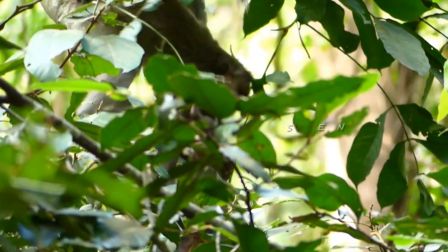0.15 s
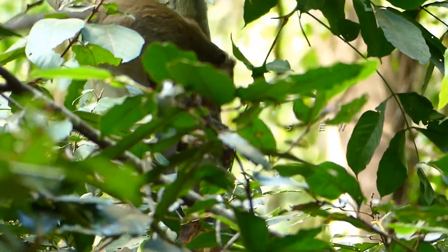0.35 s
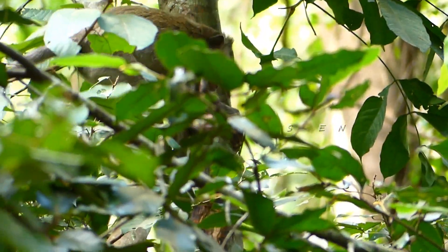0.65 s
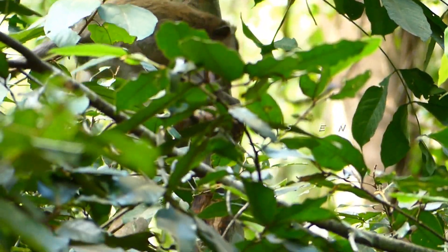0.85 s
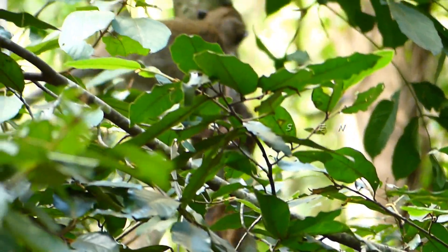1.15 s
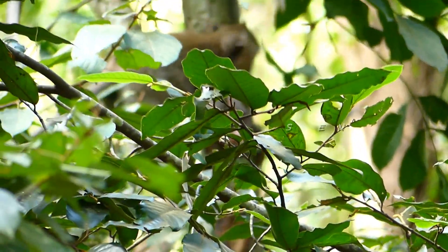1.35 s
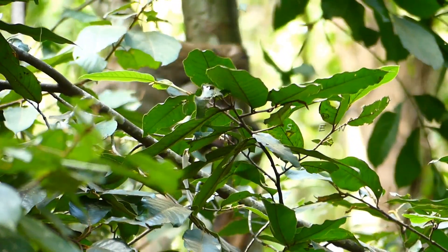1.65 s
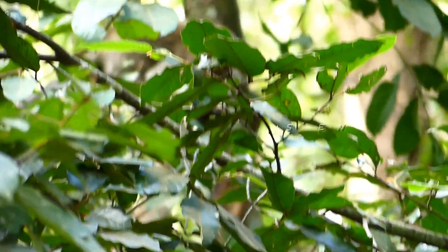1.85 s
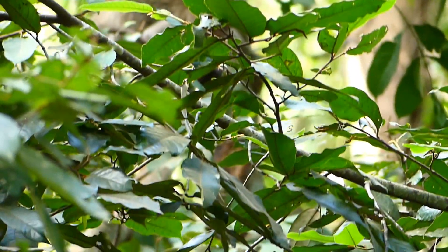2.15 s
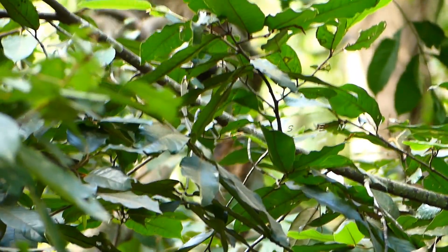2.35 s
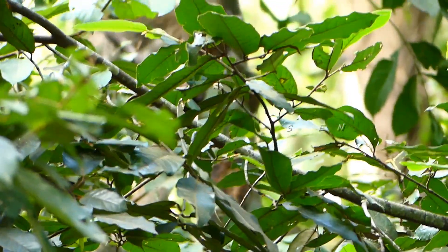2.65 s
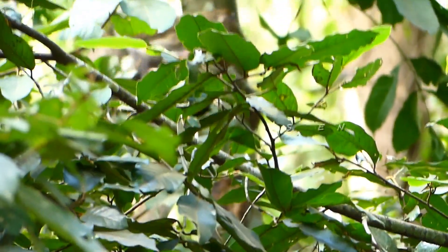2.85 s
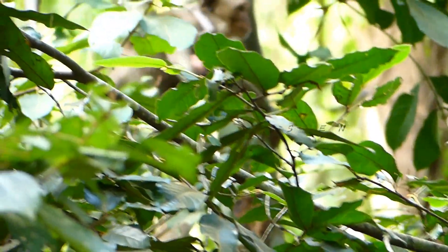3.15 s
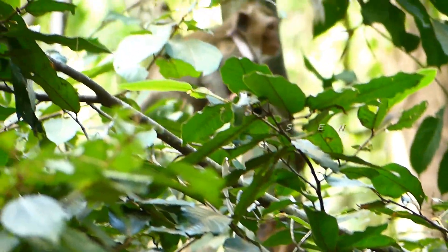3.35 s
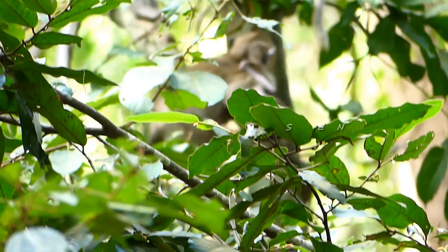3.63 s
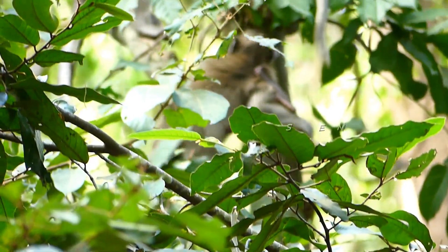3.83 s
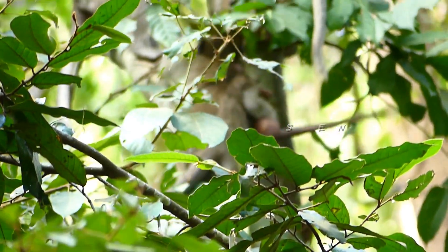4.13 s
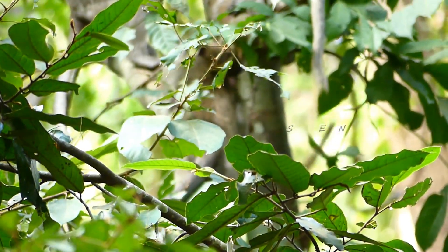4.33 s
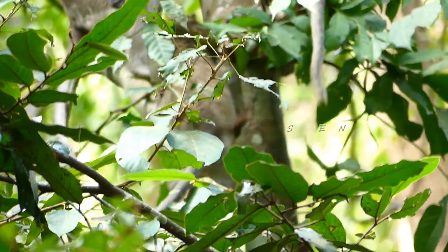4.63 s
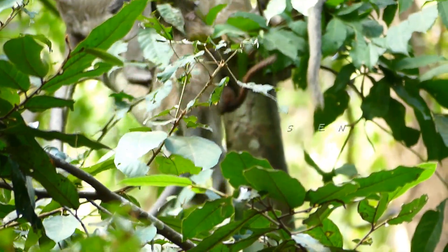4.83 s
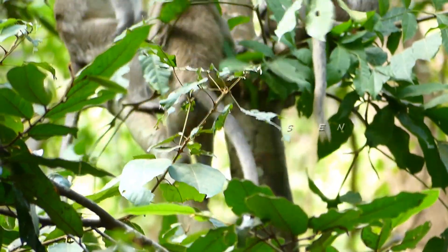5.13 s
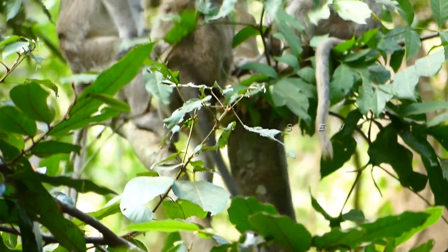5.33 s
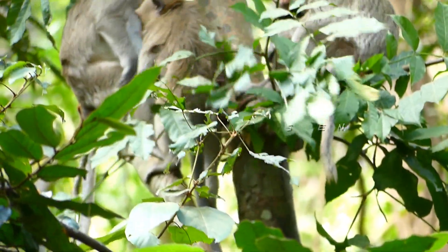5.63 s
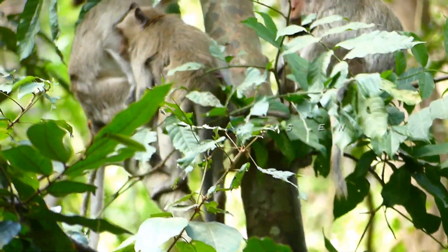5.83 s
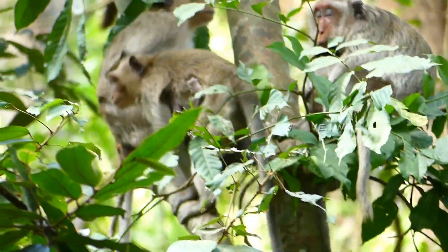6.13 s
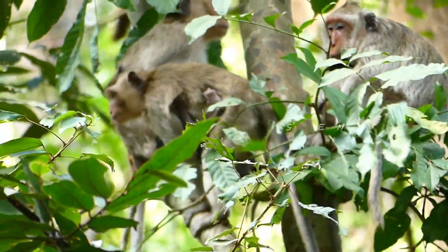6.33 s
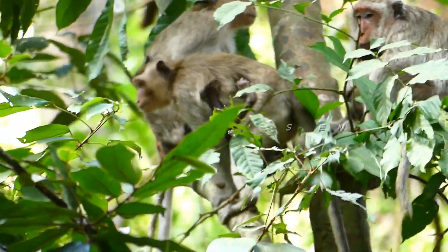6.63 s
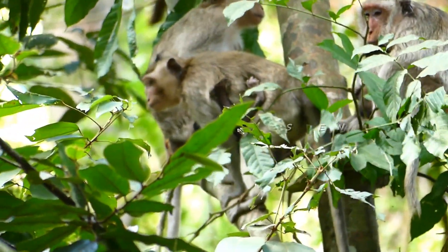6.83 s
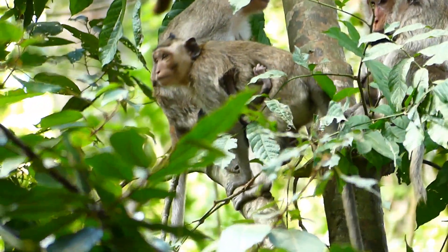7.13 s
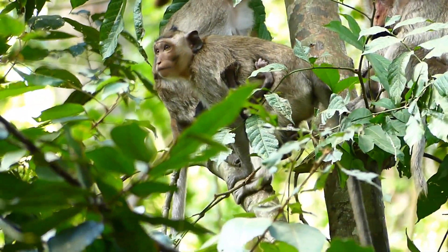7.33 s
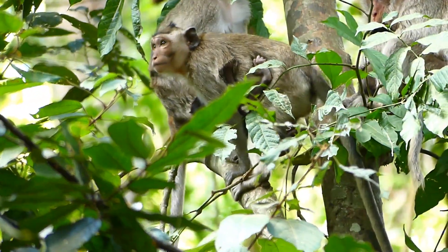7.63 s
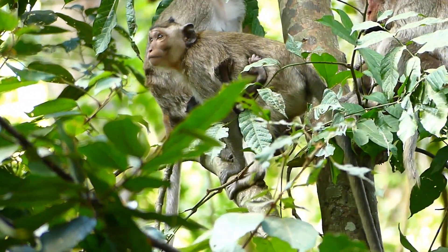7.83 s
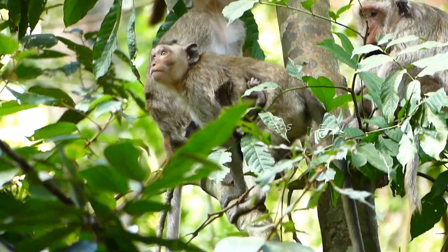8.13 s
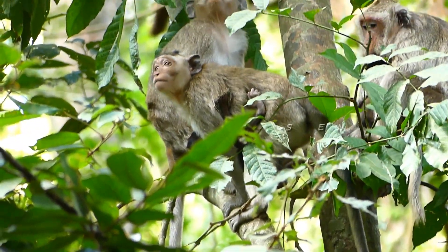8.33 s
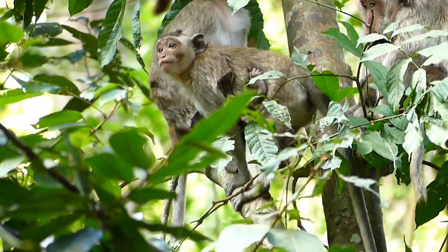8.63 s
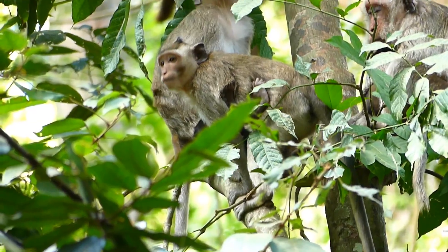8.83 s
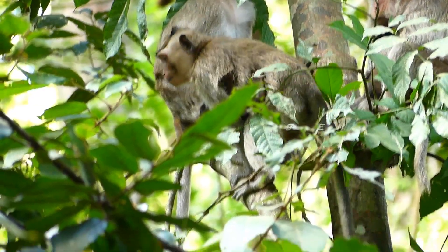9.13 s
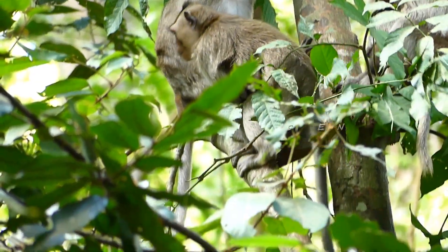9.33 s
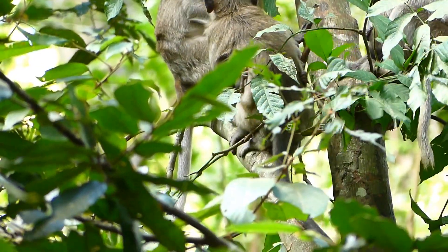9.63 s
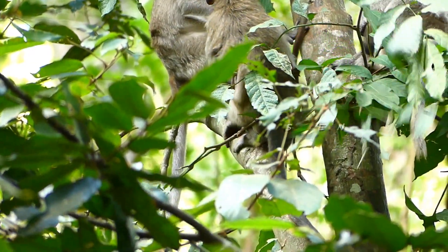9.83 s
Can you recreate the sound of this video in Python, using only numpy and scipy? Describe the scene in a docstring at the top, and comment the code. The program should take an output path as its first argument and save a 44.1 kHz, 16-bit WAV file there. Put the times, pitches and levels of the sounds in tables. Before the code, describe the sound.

Young monkeys give high sliding squeals and cries in a forest, with bird whistles, rustling leaves and small twig snaps.

```python
"""Monkeys squealing in a forest

High sliding squeals and cries, probably from the tight throats of young macaques, carry through a forest
as the troop climbs about. Birds whistle falling slurs, short chips and a row of thin rising notes.
Leaves rustle, boughs swish and twigs snap. Trunks and foliage scatter every call into a long echo,
over a soft far wash of noise."""
import sys
import numpy as np
from scipy import signal
from scipy.fft import rfft, irfft
from scipy.io import wavfile
from scipy.ndimage import uniform_filter1d

SR = 44100
rng = np.random.default_rng(int(sys.argv[2]) if len(sys.argv) > 2 else 0)


def output_pcm(signal):
    """Save a mono or channel-first signal as 16-bit PCM at the path in sys.argv[1].

    Samples are clipped to [-1, 1] before scaling.
    """
    pcm = np.clip(np.atleast_2d(signal).T, -1, 1) * 32767
    wavfile.write(sys.argv[1], SR, np.round(pcm).astype(np.int16))


N = 440118
TIME = np.arange(N) / SR

# Levels compare the rows of one table; each layer may be turned up or down afterwards.
# How alike left and right sound: f/Hz, likeness/0-1
STEREO_LIKENESS = [(30, .82), (125, .93), (500, .972), (1300, .975), (2200, .995), (6800, .992), (8500, .7),
                   (14000, .68)]
# Tone colour of each noise: f/Hz, level/dB
WASH_COLOUR = [(15, -39.5), (80, -38), (150, -14), (200, -9.5), (320, -15.5), (430, 7), (620, 1),
               (850, 15.5), (1300, -11), (2500, -44)]  # low forest wash
AIR_COLOUR = [(20, -13.5), (90, -13.5), (150, -3), (220, -15), (1000, -0.5), (3300, -3.5), (4300, -3.5),
              (7500, -9.5), (15000, -13)]  # steady far hiss
LEAF_COLOUR = [(200, -54), (1500, -23.5), (3500, -16.5), (4300, 7.5), (5000, -4.5), (6000, 1), (7600, -16),
               (9200, 7.5), (12000, -6.5), (15500, -18.5)]  # shaken leaves
BRUSH_COLOUR = [(100, -66), (500, -48), (800, -3), (1100, 6.5), (1500, 3.5), (1900, -10), (3000, -27.5),
                (6000, -29.5), (15000, -54)]  # brushing branches
SWISH_COLOUR = [(300, -62), (1300, -7.5), (2100, 0), (3100, -3), (3900, -16.5), (9000, -39.5)]  # swishing boughs
# Swells of those noises: peak t/s, swelling/s, settling/s, level/dB
WASH_SURGES = [(2.0, 1.1, 1, -85), (2.9, 0.24, 0.45, -88), (3.8, .15, 0.069, -86),
               (4.4, 0.064, 0.17, -85.5), (5.5, 0.061, .06, -78.5), (8.1, 0.65, 0.23, -83),
               (8.48, 0.07, 0.2, -81)]  # the wash grows and sinks
LEAF_SHAKES = [(.62, 0.21, .14, -72.5), (.84, 0.1, .3, -69), (1.72, 0.8, .25, -61.5),
               (2.1, 0.352, .38, -58.5), (3.0, 0.32, .5, -71.5), (6.15, 0.17, .25, -78.5),
               (9.65, 0.1, .15, -75)]  # sprays of leaves are shaken
BRANCH_BRUSHES = [(.27, 0.033, 0.13, -67), (.9, .45, 0.59, -75.5), (2.15, 1, 1, -75),
                  (2.52, 0.035, 0.047, -63), (3.63, 0.17, 0.34, -66.5), (4.39, 0.068, 0.28, -61.5),
                  (5.25, 0.37, 0.64, -73), (6.28, .04, 0.073, -68.5), (6.62, 0.19, 0.58, -74.5),
                  (7.73, .045, 0.15, -69.5), (8.33, 0.35, 0.71, -67.5), (9.68, 0.8, 0.16, -77.5)]  # branches brush as the troop moves
BOUGH_SWISHES = [(.92, 0.41, 0.14, -67), (2.5, .45, 0.166, -58.5), (3.4, 0.82, 0.5, -65),
                 (4.45, .1, 0.14, -65.5), (5.1, 0.28, .55, -62.5), (6.35, .24, 0.16, -59.5),
                 (8.5, 1, 1, -82)]  # boughs bend and swish back
# Twig snaps and leaf ticks: t/s, level/dB, centre f/Hz, width/octaves, dying time/s, gain into the echo
TWIG_SNAPS = [(0.209, -51, 6300, 0.63, 0.0091, 0.69), (0.247, -53.5, 3860, 0.36, 0.007, 0.71),
              (0.789, -56, 3226, 0.11, 0.0055, 0.42), (.81, -55, 11500, 0.12, 0.034, 0.59),
              (2.039, -52, 10830, 0.297, 0.0215, 0.42), (2.77, -46.5, 2988, 0.283, 0.0057, 1.25),
              (4.02, -60, 14400, 0.1, 0.004, 0.17), (8.03, -76, 10860, 0.4, 0.039, 1.2),
              (9.369, -45.5, 13340, 0.3, 0.0015, 0.48), (9.427, -39, 12800, 0.18, 0.00074, 0.29),
              (9.49, -55.5, 13000, 0.24, 0.0011, 0.064), (9.547, -32, 11860, 0.25, 0.00077, 0.32),
              (9.631, -48, 4110, 0.53, 0.0023, 0.44)]
# How long the echo lasts: f/Hz, time to fade by 60 dB/s
ECHO_TIMES = [(500, 0.22), (2300, 0.6), (3800, 0.39), (7000, 0.4), (11000, 0.36), (15000, 0.3)]
# Arched squeals: t/s, time to the crest/s, length/s, start f/Hz, crest f/Hz, end f/Hz, soft lead-in/s,
# level/dB, octave overtone/dB, roughness/0-1
MONKEY_SQUEALS = [(1.015, 0.12, .455, 8140, 7763, 4640, 0.087, -40, -6.5, 0.23),
                  (2.148, 0.11, 0.42, 7400, 7724, 4200, 0.035, -37.5, -7.5, .17),
                  (2.889, 0.099, 0.2876, 5000, 6834, 4770, 0.14, -34.5, -7.5, 0.33),
                  (3.336, 0.071, 0.097, 7460, 7380, 4750, 0.067, -34.5, -10.5, .35),
                  (4.125, 0.16, .27, 5470, 7460, 4080, 0.17, -34, -9, 0.15),
                  (5.026, .078, 0.21, 5100, 5253, 3960, .025, -50.5, -8.5, 0.2),
                  (6.155, .078, .25, 6060, 6790, 3875, 0.11, -37.5, -5, 0.26),
                  (7.571, 0.026, 0.086, 6040, 6360, 4700, 0.01, -42.5, -6, 0.22)]
# Held cries, the roughest a scream: t/s, attack/s, length/s, start f/Hz, end f/Hz, level/dB,
# octave overtone/dB, roughness/0-1
MONKEY_CRIES = [(2.55, 0.013, 0.035, 4010, 3554, -33.5, -28, 0.07),
                (2.98, 0.042, .25, 4045, 4300, -46, -4, .97),
                (3.021, 0.011, 0.036, 3890, 4173, -37, -6, .08),
                (3.171, 0.011, 0.089, 3765, 3904, -35.5, -8.5, 0.38),
                (3.193, 0.011, 0.08, 6280, 6800, -29.5, -14.5, 0.2),
                (3.609, .02, 0.15, 4564, 4294, -50.5, 1.5, 0.3),
                (3.704, 0.013, 0.1023, 4005, 3577, -37.5, -13.5, 0.19),
                (3.758, 0.017, 0.059, 4090, 3950, -46, -2, .42),
                (4.389, 0.027, 0.078, 3975, 3636, -35, -18, 0.33),
                (5.144, 0.0086, 0.1578, 3754, 3640, -39, -22.5, 0.21),
                (6.381, .025, .165, 3920, 3860, -36.5, -20.5, 0.29),
                (6.779, .02, .08, 3290, 3800, -64, -11, 0.54),
                (6.858, 0.051, 0.18, 3834, 3593, -39.5, -18, 0.17),
                (7.647, .012, 0.024, 4205, 2707, -38.5, -7, 0.5)]
# Low falling slurs: far bird whistles, and the falling undertone of the yelp at 3.8 s:
# t/s, length/s, start f/Hz, end f/Hz, level/dB, fading over the note/dB
LOW_SLURS = [(2.852, 0.032, 3160, 2185, -33, 6.5), (2.892, 0.18, 2626, 2071, -42, 6),
             (3.815, 0.04, 3490, 2120, -48.5, 13), (4.404, 0.057, 3133, 2325, -40, 19),
             (5.296, 0.086, 3570, 2424, -54.5, 3.5), (5.522, 0.34, 3278, 2115, -43.5, 9.5),
             (5.871, 0.05, 3277, 2100, -47, -4.5), (5.934, 0.12, 2577, 2025, -38.5, 11),
             (6.08, 0.33, 2678, 2243, -50.5, 15.5)]
# Points along one sharp yelp: t/s, f/Hz, level/dB, octave overtone/dB, roughness/0-1
YELP_PATH = [(3.806, 5900, -46, -12, .5), (3.826, 4750, -27, -16, .65), (3.835, 4250, -24, -24, .3),
             (3.843, 4110, -19, -26, .15), (3.852, 4000, -29, -18, .7), (3.875, 3500, -40, -16, .6)]
# Short bird notes: t/s, length/s, start f/Hz, end f/Hz, level/dB
BIRD_CHIPS = [(4.244, 0.035, 7440, 4630, -39.5), (5.491, 0.047, 7542, 4660, -42.5),
              (5.819, 0.024, 4980, 4305, -45), (6.017, 0.0152, 4845, 4386, -57),
              (7.481, 0.048, 7640, 4640, -46.5), (8.255, .047, 7380, 4580, -42.5)]  # falling
BIRD_RISES = [(7.12, 0.0563, 1810, 2220, -71.5), (7.893, 0.049, 1944, 2340, -71.5),
              (8.169, 0.045, 1864, 2060, -80), (7.418, 0.13, 4030, 5580, -64),
              (7.734, 0.11, 3960, 6224, -60.5), (8.046, 0.1243, 4010, 6330, -60),
              (8.325, 0.098, 3960, 6090, -55.5), (8.604, 0.1446, 3810, 6220, -61),
              (8.814, 0.017, 3620, 5830, -54.5), (8.94, 0.1, 3790, 5770, -67),
              (9.252, 0.12, 3820, 6050, -66), (9.4, 0.073, 5560, 6370, -70.5),
              (9.568, 0.079, 4000, 5900, -65.5)]  # thin and rising


def amp(db):
    """Turns decibels into a gain."""
    return 10 ** (np.asarray(db) / 20)


def evened(x):
    """Scales a signal to an average strength (rms) of 1."""
    return x / np.sqrt(np.mean(x ** 2) + 1e-20)


def read(points, hz):
    """Reads between the rows of a table, on a log-frequency axis."""
    f, value = np.transpose(points)
    return np.interp(np.log(hz + 1), np.log(f + 1), value)


def add(mix, s, sound):
    """Mixes a sound in at s seconds."""
    part = mix[max(round(s * SR), 0):][:len(sound)]
    part += sound[:len(part)]


def flutter(size, hz):
    """Random wavering, up to about hz times a second."""
    f = np.fft.rfftfreq(size, 1 / SR)
    return evened(irfft(rfft(rng.standard_normal(size)) * np.exp(-.5 * (f / hz) ** 2), size))


def hiss(size, hz, octaves):
    """A band of noise around hz."""
    f = np.fft.rfftfreq(size, 1 / SR) + 1
    band = np.exp(-.5 * (np.log2(f / hz) / octaves) ** 2)
    return evened(irfft(rfft(rng.standard_normal(size)) * band, size))


def stereo(spectra, hz):
    """Blends two unrelated spectra into a left and a right that are mostly alike."""
    same = np.clip(read(STEREO_LIKENESS, hz), 0, 1)
    mid, side = np.sqrt((1 + same) / 2) * spectra[0], np.sqrt((1 - same) / 2) * spectra[1]
    return np.array([mid + side, mid - side])


def airy(colour, patchy_db):
    """Stereo noise of a given colour, with drifting louder and softer patches."""
    hz = np.fft.rfftfreq(1024, 1 / SR)
    shape = (2, N // 256 + 5, len(hz))
    spectra = stereo(rng.standard_normal(shape) + 1j * rng.standard_normal(shape), hz)
    drift = uniform_filter1d(rng.standard_normal(shape[1:]), size=12, axis=0)
    patches = evened(uniform_filter1d(drift, size=16, axis=1))
    spectra *= amp(read(colour, hz) + patchy_db * patches)
    return evened(signal.istft(spectra.transpose(0, 2, 1), nperseg=1024, noverlap=768)[1][:, :N])


def sway(moves, roundness=1.5):
    """A gain that swells and settles with each movement; overlapping ones add in power."""
    power = np.zeros(N)
    for s, swell, settle, db in moves:
        away = np.maximum((s - TIME) / swell, (TIME - s) / settle)
        power += (amp(db) * np.exp(-np.minimum(away, 20) ** roundness)) ** 2
    return np.sqrt(power)


def far_wash():
    """A low wash of noise swells now and then over a steady far hiss."""
    swells = amp(8) * np.hypot(sway(WASH_SURGES), amp(-98.5))
    return swells * airy(WASH_COLOUR, patchy_db=3) + amp(-85) * airy(AIR_COLOUR, patchy_db=3)


def leaves(rest_db=-94.5, crackle_db=2):
    """Leaves rub with a fine uneven grain and keep stirring between shakes."""
    rustle = evened(airy(LEAF_COLOUR, patchy_db=2.6) * amp(crackle_db * flutter(N, 150)))
    return np.hypot(sway(LEAF_SHAKES), amp(rest_db)) * rustle


def boughs(rest_db=-86):
    """Branches brush and swish back; the level flickers as twigs catch and let go."""
    brushing = np.hypot(sway(BRANCH_BRUSHES), amp(rest_db)) * airy(BRUSH_COLOUR, patchy_db=2.1)
    swishing = sway(BOUGH_SWISHES) * airy(SWISH_COLOUR, patchy_db=2.1)
    return (brushing + swishing) * amp(2.5 * flutter(N, 13) + 0.4 * flutter(N, 140))


def snaps():
    """Each break or tick is a quick puff of noise; returns the direct sound and the part that echoes."""
    direct, sent = np.zeros((2, N))
    t = np.arange(8192) / SR
    for s, db, hz, octaves, dying, echo_gain in TWIG_SNAPS:
        envelope = np.exp(-t / dying) * (1 - np.exp(-t / (0.45 * dying)))
        puff = amp(db + 6) * hiss(len(t), hz, octaves) * envelope
        crack = signal.sosfilt(signal.butter(4, hz / 5, "high", fs=SR, output="sos"), puff)
        add(direct, s, crack)
        add(sent, s, echo_gain * crack)
    return direct, sent


def echo_tail(sound, echoes_per_s=5000, build_s=0.0027):
    """A dense echo tail, shaped to hold briefly and then fade ever faster."""
    t = np.arange(SR) / SR
    bounces = rng.standard_normal((2, SR)) * (rng.random(SR) < echoes_per_s / SR)
    hz, delay, spectra = signal.stft(bounces * (1 - np.exp(-t / build_s)), SR, nperseg=256)
    fading = amp(-60 * (delay[:, None] / read(ECHO_TIMES, hz)) ** 1.275)
    spectra = stereo(spectra.transpose(0, 2, 1), hz) * fading
    tail = signal.istft(spectra.transpose(0, 2, 1), SR, nperseg=256)[1]
    return signal.fftconvolve(sound[None], tail / np.linalg.norm(tail[0]), axes=1)[:, :N]


def larynx(hz, db, octave_db, rough, third_db=-1, ring_hz=11000, top_hz=15400, buzz_hz=1100, edge_s=.012):
    """A tight voice box whistles with two overtones; under strain it wavers, buzzes and rasps."""
    size, rough = len(hz), np.clip(rough, 0, 1)
    jitter = .1 * rough * flutter(size, 350)
    quaver = 0.012 * np.tanh(rough / 0.24) * flutter(size, 80)
    wobble = .008 * flutter(SR, 14)[:size]
    phase = 2 * np.pi * np.cumsum(hz * (1 + jitter + quaver + wobble)) / SR
    # the throat rings, lifting overtones near ring_hz; they die away around top_hz
    lift = [amp(4 * np.exp(-((k * hz - ring_hz) / 1400) ** 2)) for k in (2, 3)]
    octave = amp(octave_db) * lift[0] / (1 + (2 * hz / top_hz) ** 30)
    third = amp(third_db + 2 * octave_db) * lift[1] * np.clip((top_hz - 3 * hz) / 1200, 0, 1)
    voice = np.sin(phase) + octave * np.sin(2 * phase) + third * np.sin(3 * phase)
    # a second, slower shaking of the vocal folds adds a buzz
    buzz_phase = 2 * np.pi * np.cumsum(buzz_hz * (1 + 0.15 * flutter(size, 200))) / SR
    voice *= 1 + 0.67 * rough ** 2 * np.sin(buzz_phase)
    rasp = amp(-8) * hiss(size, ring_hz, octaves=.3) + amp(-6) * hiss(size, hz=4930, octaves=.3)
    shimmer_db = 6 * np.sqrt(rough) * flutter(size, 56)
    soft_edges = signal.windows.tukey(size, min(edge_s * SR / size, 1))
    return amp(db + shimmer_db) * soft_edges * (np.sqrt(2) * voice + rough ** 4 * rasp)


def squeal(row, scoop_s=0.027, push_s=.004, crest_rough=0.36):
    """A monkey glides softly to a high note, pushes to full voice and slides down, rougher and duller."""
    s, crest, length, start_hz, crest_hz, end_hz, lead_in, db, octave_db, rough = row
    t = np.arange(int(length * SR)) / SR
    scoop = np.exp(-t / scoop_s)
    fall = np.clip((t - crest) / (length - crest), 0, 1)
    hz = crest_hz + (start_hz - crest_hz) * scoop + (end_hz - crest_hz) * fall ** 1.6
    soft = (1 - np.tanh((t - lead_in) / push_s)) / 2  # 1 in the lead-in, 0 after the push
    strain = (crest_rough + (1 - crest_rough) * fall) * (1 - soft / 2)
    level_db = db - 16.5 * soft - 4.5 * fall
    overtone_db = octave_db + soft - 12.5 * fall ** 4
    return s, (1 - scoop) * larynx(hz, level_db, overtone_db, rough * strain, third_db=-4)


def cry(row, release_s=0.015, fade_db=4.5):
    """A monkey holds a note, usually near one pitch, and lets it fade a little."""
    s, attack, length, start_hz, end_hz, db, octave_db, rough = row
    t = np.arange(int(length * SR)) / SR
    opening = np.sin(np.pi / 2 * np.minimum(t / attack, 1)) ** 2
    closing = np.minimum((length - t) / release_s, 1)
    hz = np.geomspace(start_hz, end_hz, len(t))
    return s, opening * closing * larynx(hz, db - fade_db * t / length, octave_db, rough, third_db=3.5)


def whistle(hz, waver, taper):
    """A nearly pure tone; taper is the share of it spent fading in and out."""
    turns = np.cumsum(hz * (1 + waver * flutter(len(hz), 140))) / SR
    return np.sqrt(2) * np.sin(2 * np.pi * turns) * signal.windows.tukey(len(hz), np.clip(taper, 0, 1))


def slur(row, settle_s=0.045):
    """A whistle that drops fast, then levels out towards its low note."""
    s, length, start_hz, end_hz, db, fading_db = row
    t = np.arange(int(length * SR)) / SR
    hz = end_hz + (start_hz - end_hz) * np.exp(-t / settle_s)
    return s, amp(db - fading_db * t / length) * whistle(hz, waver=.038, taper=.02 / length)


def yelp():
    """A monkey's voice plunges roughly and clears for an instant at its loudest."""
    times, *controls = np.transpose(YELP_PATH)
    t = np.arange(times[0], times[-1], 1 / SR)
    return times[0], larynx(*(np.interp(t, times, control) for control in controls))


def bird_note(row, taper, waver):
    """A whistle that slides evenly from one pitch to another."""
    s, length, start_hz, end_hz, db = row
    return s, amp(db) * whistle(np.geomspace(start_hz, end_hz, int(length * SR)), waver, taper)


def scene():
    """Monkeys and birds call some way off among the trees, over rustle and wash."""
    troop, yelper, whistles = np.zeros((3, N))
    for row in MONKEY_SQUEALS:
        add(troop, *squeal(row))
    for row in MONKEY_CRIES:
        add(troop, *cry(row))
    add(yelper, *yelp())
    for row in BIRD_CHIPS:
        add(whistles, *bird_note(row, taper=0.81, waver=0.016))
    for row in BIRD_RISES:
        add(whistles, *bird_note(row, taper=.6, waver=.006))
    for row in LOW_SLURS:
        add(whistles, *slur(row))
    cracks, cracks_sent = snaps()
    direct = amp(-4) * (troop + yelper) + amp(-5) * whistles + cracks
    # the yelp is nearer, so it raises less echo; the whistles, mostly far birds, raise more
    echoes = echo_tail(amp(-4.5) * (troop + amp(-7) * yelper) + amp(-2.5) * whistles + cracks_sent)
    return direct + echoes + far_wash() + boughs() + leaves()


def record(dry):
    """Cuts away the very highest treble."""
    low_pass = signal.firwin(511, cutoff=15900, window=("kaiser", 9), fs=SR)
    return signal.oaconvolve(dry, low_pass[None], "same")


dry = scene()
out = record(dry)
output_pcm(out)
```